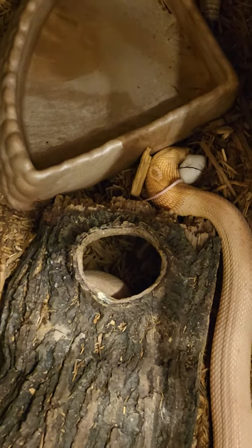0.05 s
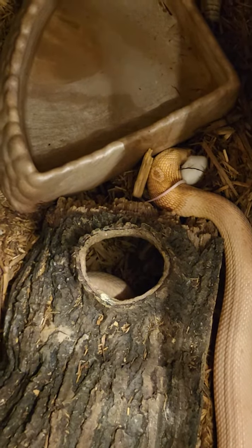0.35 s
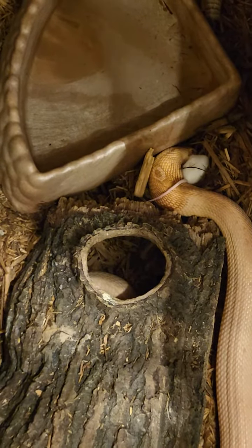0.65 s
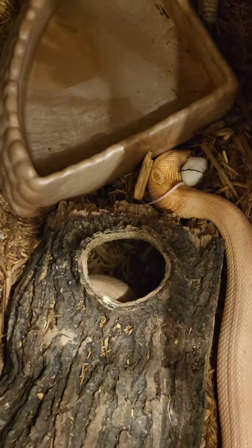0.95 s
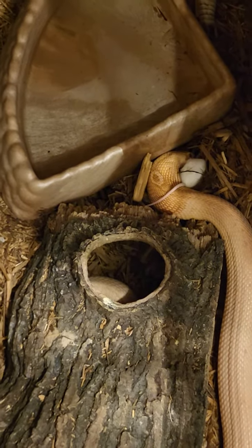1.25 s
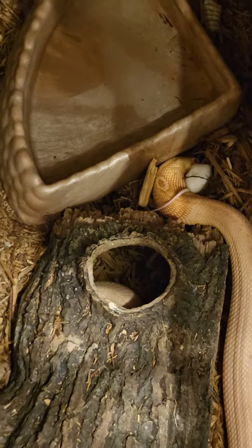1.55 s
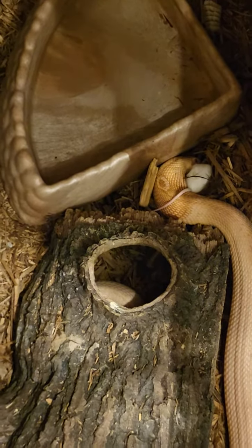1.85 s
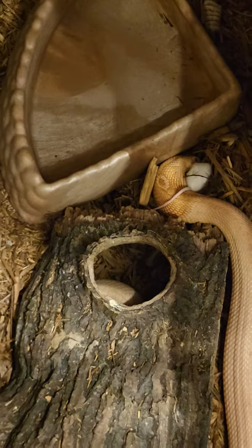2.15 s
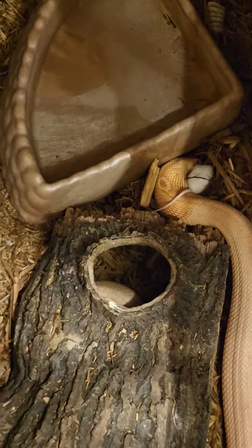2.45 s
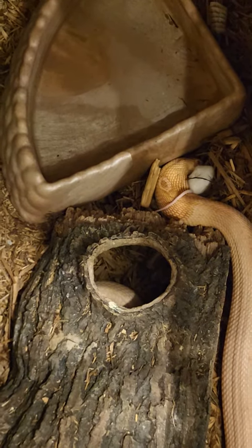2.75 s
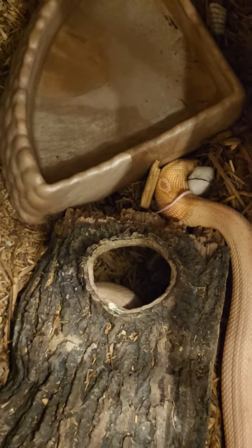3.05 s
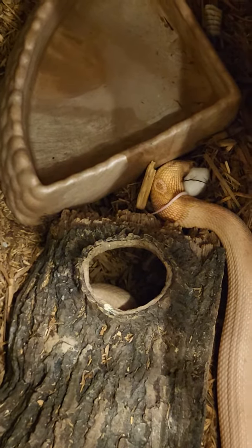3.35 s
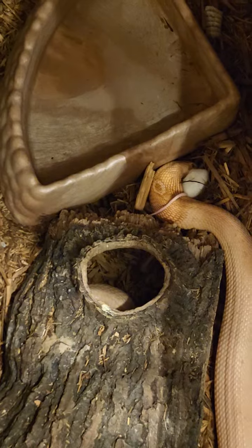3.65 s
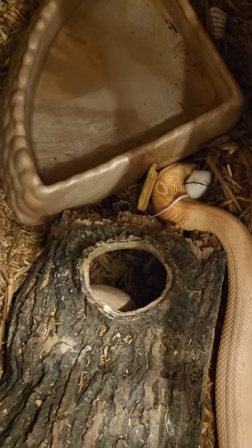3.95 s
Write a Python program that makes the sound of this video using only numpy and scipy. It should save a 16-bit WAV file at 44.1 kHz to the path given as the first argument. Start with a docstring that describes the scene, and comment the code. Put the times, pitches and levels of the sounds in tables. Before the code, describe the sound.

A snake gives a dry, raspy hiss that swells three times, the last one strongest. A few faint scuffs and soft bumps surround it, heard close to its enclosure over a low motor drone and room rumble.

```python
"""A dry, hissing rub swells three times, close to a snake's enclosure in a quiet room.
Something slides: friction noise and tiny catches excite resonances, brighter the harder the push.
A thin squeak, small ticks, scuffs and soft bumps surround it.
A motor drones under mains hum and a low room rumble; two spaced microphones listen."""
import sys
import numpy as np
from scipy import signal
from scipy.fft import rfft, irfft, next_fast_len
from scipy.io import wavfile
from scipy.ndimage import map_coordinates

SR = 44100
rng = np.random.default_rng(int(sys.argv[2]) if len(sys.argv) > 2 else 0)


def generate_wav(signal):
    """Clip the signal to [-1, 1] and save it as 16-bit WAV at the path in sys.argv[1]."""
    frames = np.transpose(np.atleast_2d(signal))
    scaled = np.clip(frames, -1, 1) * 32767
    pcm = np.round(scaled).astype(np.int16)
    wavfile.write(sys.argv[1], SR, pcm)


N = 176400

# room sound common to both microphones (frequency [Hz], power share [0-1])
ROOM_COHERENCE = [(60, 0.93), (140, 0.83), (300, 0.92), (600, 0.15), (1500, 0.073), (12000, 0.049)]
# room balance (frequency [Hz], left minus right [dB])
ROOM_BALANCE = [(60, 0.5), (150, 1.5), (400, 2.5), (1000, 0), (2500, -3), (7000, -0.5), (13000, -2),
                (15000, -5.5)]


def amp(db):
    """Decibels to gain."""
    return 10 ** (np.asarray(db) / 20)


def unit(x):
    """Scale to rms 1."""
    return x / np.sqrt(np.mean(x ** 2) + 1e-20)


def along(points, hz):
    """Interpolate (frequency [Hz], value) points on a log axis."""
    knots_hz, values = np.transpose(points)
    return np.interp(np.log(hz + 1), np.log(knots_hz + 1), values)


def times():
    """Sample times [s]."""
    return np.arange(N) / SR


def level(rows, lag_s=0):
    """Level curve [dB], falling 400 dB/s outside its ends."""
    knots_s, db = np.transpose(rows)
    t = times() - lag_s
    return np.interp(t, knots_s, db) - 400 * abs(t - np.clip(t, knots_s[0], knots_s[-1]))


def wobble(knots_per_s):
    """Smooth random curve."""
    knots = rng.standard_normal(int(N * knots_per_s / SR) + 4)
    return map_coordinates(knots, [times() * knots_per_s])


def swell(start_s, length_s):
    """Quick rise, slower fall, peak 1."""
    u = np.maximum(times() - start_s, 0) / length_s * 5
    return u * np.exp(1 - u)


def filtered(x, response):
    """Apply a frequency response."""
    size = next_fast_len(N + SR // 2)
    return irfft(rfft(x, size) * response(np.fft.rfftfreq(size, 1 / SR)), size)[..., :N]


def colour(points):
    """Response through (frequency [Hz], gain [dB]) points."""
    return lambda f: amp(along(points, f))


def resonant(modes):
    """Response of steep-sided resonances (centre [Hz], nominal width [Hz], gain [dB])."""
    return lambda f: sum(amp(db) * abs(f * width / (hz * hz - f * f + 1j * f * width)) ** 1.52
                         for hz, width, db in modes)


def noise():
    """Three white noises: common, left, right."""
    return rng.standard_normal((3, N))


def friction():
    """Noise with a dense spray of tiny catches of random size."""
    catches_per_s, catch_share = 2500, 0.51
    catches = (rng.random((3, N)) < catches_per_s / SR) * noise()
    return np.sqrt(1 - catch_share) * noise() + np.sqrt(catch_share) * unit(catches)


def spread(x, response, coherence, balance, left_lead_s=0):
    """Coloured stereo of rms 1 from common, left and right signals."""
    side = np.array([[.5], [-.5]])
    share = lambda f: np.clip(along(coherence, f), 0, 1)
    common = filtered(x[0], lambda f: np.sqrt(share(f)) * np.exp(2j * np.pi * f * left_lead_s * side))
    apart = filtered(x[1:], lambda f: np.sqrt(1 - share(f)))
    return unit(filtered(common + apart, lambda f: response(f) * amp(side * along(balance, f))))


def room():
    """Steady rumble, room resonances and faint air."""
    # noise spectra (frequency [Hz], relative density [dB])
    rumble = [(20, -5), (32, -10), (45, 0), (62, 11), (78, -0.5), (100, 1.5), (135, -5.5), (200, -18),
              (280, -14), (330, -19.5), (480, -23.5), (700, -34.5), (1500, -54.5), (4000, -75)]
    air = [(350, -41), (600, -7), (777, -2), (1020, -9), (1060, -14.5), (1380, -5.5), (1490, -12.5),
           (1930, -4), (2400, -12.5), (3300, -10.5), (4430, -15), (6850, -18.5), (15500, -17)]
    # room resonances (centre [Hz], nominal width [Hz], relative gain [dB])
    modes = [(97, 19.5, 2.5), (191.8, 12.2, -0.5), (261.5, 24, -11.5), (1002, 49, -30)]
    layers = [(colour(rumble), -55.5), (resonant(modes), -60), (colour(air), -77.5)]
    return sum(amp(db) * spread(noise(), response, ROOM_COHERENCE, ROOM_BALANCE)
               for response, db in layers)


def motor():
    """Low drone, wavering in level and phase, louder on the left."""
    # drone envelope (time [s], level [dB])
    envelope = [(0.0, -46.5), (0.04, -44), (0.21, -50.5), (0.36, -42), (0.47, -51), (0.51, -45),
                (1.45, -44.5), (1.48, -52), (1.56, -41), (1.6, -50), (1.77, -43.5), (2.18, -44.5),
                (2.32, -60), (2.36, -43), (2.46, -51.5), (2.49, -44.5), (2.65, -48.5), (2.7, -56),
                (2.74, -44), (2.87, -49), (2.96, -42.5), (3.26, -47.5), (3.33, -42.5), (3.44, -47.5),
                (3.69, -42.5), (4.0, -47)]
    drone_hz, gain_db, balance_db = 58.7, 0.04, 3
    tone = np.sqrt(2) * np.sin(2 * np.pi * drone_hz * times() + 0.21 * wobble(7.7))
    return amp(level(envelope) + gain_db) * tone * amp(balance_db * np.array([[.5], [-.5]]))


def mains_hum():
    """Three mains harmonics, each wavering on its own."""
    # hum lines (frequency [Hz], rms level [dB])
    lines = [(119.6, -64), (179, -68), (240, -70)]
    tone = lambda hz: np.sqrt(2) * np.sin(2 * np.pi * hz * times() + 0.28 * wobble(5.1))
    return sum(amp(db + 1.7 * wobble(4.9)) * tone(hz) for hz, db in lines)


def contact_noise(response):
    """Coloured friction with the room's stereo spread."""
    return spread(friction(), response, ROOM_COHERENCE, ROOM_BALANCE)


def squeak():
    """Thin band of friction noise as the rub starts."""
    centre_hz, width_hz, level_db = 5200, 730, -79
    band = contact_noise(resonant([(centre_hz, width_hz, 0)]))
    return amp(level_db) * swell(start_s=.818, length_s=0.11) * band


def ticks():
    """Dry ticks: sudden noise bursts with a fast decay."""
    # ticks (time [s], level [dB])
    events = [(.921, -67.5), (.990, -57.5)]
    # tick spectrum (frequency [Hz], relative density [dB])
    spectrum = [(300, -14), (1500, -10), (2400, -17), (3500, 2), (5500, -4), (7900, -1), (10000, -23),
                (15000, -9)]
    t, t60_s = times(), .025
    envelope = sum(amp(db - 60 * abs(t - start_s) / t60_s) * (t >= start_s) for start_s, db in events)
    return envelope * contact_noise(colour(spectrum))


def scuffs():
    """Light, brief swells of broadband friction."""
    # scuffs (time [s], level [dB], length [s])
    events = [(0.871, -77.5, 0.071), (2.486, -82.5, 0.1), (2.545, -88, .05), (2.938, -77, 0.079),
              (3.283, -87, 0.1), (3.473, -75, 0.11), (3.625, -84, 0.078)]
    # scuff spectrum (frequency [Hz], relative density [dB])
    spectrum = [(500, -24), (1300, 1), (3000, -1), (5000, -2), (7500, 0), (10000, -17), (15000, -19.5)]
    envelope = sum(amp(db) * swell(start_s, length_s) for start_s, db, length_s in events)
    return envelope * contact_noise(colour(spectrum))


def bumps():
    """Soft bumps: noise swells through one broad resonance each."""
    # bumps (time [s], level [dB], centre [Hz], length [s])
    events = [(1.588, -51.5, 167, 0.053), (1.824, -62, 810, .07), (1.858, -52.5, 265, 0.062),
              (2.371, -71, 404, 0.13), (2.936, -76, 790, 0.1), (3.335, -82, 1100, 0.086),
              (3.538, -69, 725, 0.022)]
    return sum(amp(db) * swell(start_s, length_s) * contact_noise(resonant([(hz, 0.54 * hz, 0)]))
               for start_s, db, hz, length_s in events)


def walls(x):
    """Add the enclosure's short, dense echo, different at each microphone."""
    t60_s, echo_db = 0.1, -3.5
    t = np.arange(SR // 8) / SR
    tail = rng.standard_normal((2, len(t))) * amp(-60 * t / t60_s)
    tail /= np.linalg.norm(tail, axis=1, keepdims=True)
    echo = amp(echo_db) * signal.fftconvolve(x, tail, axes=1)[:, :N]
    return (x + echo) / np.hypot(1, amp(echo_db))


def near_friction(response):
    """Close, coloured friction; its direct sound reaches the left microphone first."""
    # direct sound (frequency [Hz], power share [clipped to 0-1])
    direct = [(200, 2.5), (700, 0.86), (1100, 0.66), (3200, 1.36), (4000, -0.67), (8000, -0.04),
              (14000, -2)]
    # rub balance (frequency [Hz], left minus right [dB])
    balance = [(250, 1.5), (700, 2.5), (1200, 3), (1950, -6), (2650, 7), (3300, -8), (4100, -3.5),
               (4900, 6.5), (6200, 0), (7800, 0), (9300, -0.5), (13500, -5), (15000, -6)]
    return spread(friction(), response, direct, balance, left_lead_s=0.00036)


def rub():
    """Dry sliding friction: hiss, resonances, a whistly band, treble fizz and a lagging low body."""
    # layer envelopes (time [s], level [dB])
    rub_envelope = [(0.86, -85.5), (0.926, -75), (0.98, -82.5), (0.992, -72), (1.002, -74.5), (1.114, -59),
                    (1.222, -79.5), (1.304, -64), (1.36, -70.5), (1.46, -61), (1.468, -66), (1.58, -56.5),
                    (1.672, -63), (1.79, -56.5), (1.846, -52), (1.872, -56.5), (1.905, -67), (1.955, -80),
                    (2.02, -92)]
    whistle_envelope = [(0.97, -99), (0.99, -84), (1.11, -67), (1.14, -74), (1.228, -81), (1.304, -66),
                        (1.354, -72.5), (1.5, -66.5), (1.576, -62.5), (1.66, -70), (1.78, -78),
                        (1.862, -60), (1.93, -80)]
    fizz_envelope = [(1.0, -82), (1.044, -82.5), (1.14, -65), (1.166, -79), (1.212, -86), (1.32, -87),
                     (1.496, -76.5), (1.596, -64), (1.656, -73), (1.828, -59.5), (1.856, -63), (1.97, -84)]
    # layer spectra (frequency [Hz], relative density [dB])
    hiss_spectrum = [(500, -50), (1400, -12.5), (1900, 0), (2650, -8.5), (3300, -4), (4000, -4.5),
                     (4700, -7.5), (6400, -11), (7700, -6), (8700, -22), (11000, -23), (16000, -62)]
    fizz_spectrum = [(1500, -1.5), (4500, -7.5), (8000, -2), (9700, -9.5), (11500, -3.5), (13500, -2),
                     (15700, -4.5)]
    body_spectrum = [(40, -18), (90, 11.5), (250, 4.5), (400, 0), (520, 0.5), (650, -6.5), (900, -1),
                     (1180, -3), (1400, -5), (2500, -9), (6000, -61)]
    # friction-driven modes (centre [Hz], nominal width [Hz], level re full push [dB], growth [dB/dB])
    modes = [ (722, 22, -19, 1), (1215, 40, -16, 1), (1990, 140, -9, .8), (2268, 48, -7.5, 1.05),
             (2920, 160, -10.5, 1.5), (5580, 130, -19, .9), (7100, 300, -9, 1.15)]
    full_push_db, body_growth = -55, 0.53
    hiss_gain_db, whistle_gain_db, fizz_gain_db, body_gain_db = 2.5, 2, 7, -1
    whistle_hz, whistle_width_hz = 3220, 235

    push_db = level(rub_envelope) - full_push_db
    hiss = amp(level(rub_envelope) + hiss_gain_db) * near_friction(colour(hiss_spectrum))
    ring = sum(amp(full_push_db + db + growth * push_db) * near_friction(resonant([(hz, width_hz, 0)]))
               for hz, width_hz, db, growth in modes)
    whistle_band = near_friction(resonant([(whistle_hz, whistle_width_hz, 0)]))
    whistle = amp(level(whistle_envelope) + whistle_gain_db) * whistle_band
    fizz = amp(level(fizz_envelope) + fizz_gain_db) * near_friction(colour(fizz_spectrum))
    late_push_db = level(rub_envelope, lag_s=0.028) - full_push_db
    body_db = full_push_db + body_gain_db + body_growth * late_push_db
    body = amp(body_db) * near_friction(colour(body_spectrum))
    layers = walls(hiss + body) + ring + whistle + fizz
    flutter_db = .6 * wobble(knots_per_s=70)
    return layers * amp(flutter_db)


def scene():
    """Sum at the two microphones."""
    return rub() + squeak() + ticks() + scuffs() + bumps() + motor() + mains_hum() + room()


def record(dry):
    """Brick-wall low-pass."""
    cutoff_hz = 15780
    return filtered(dry, lambda hz: hz < cutoff_hz)


dry = scene()
out = record(dry)
generate_wav(out)
```